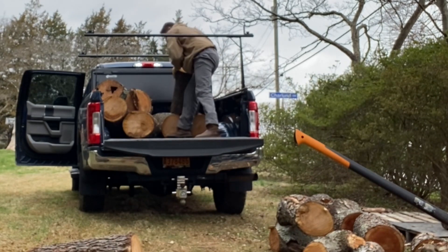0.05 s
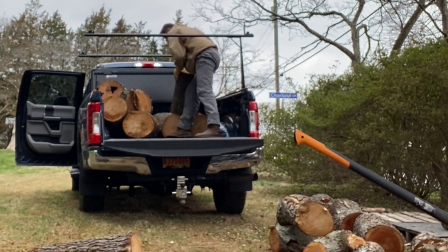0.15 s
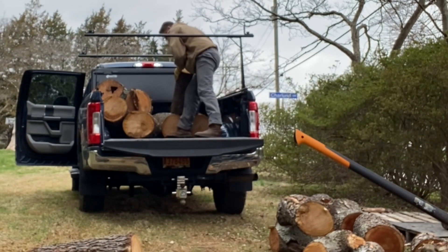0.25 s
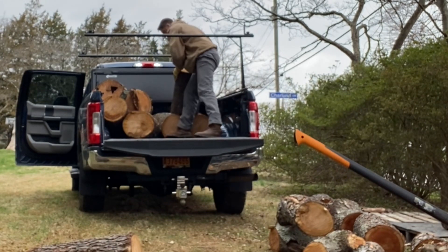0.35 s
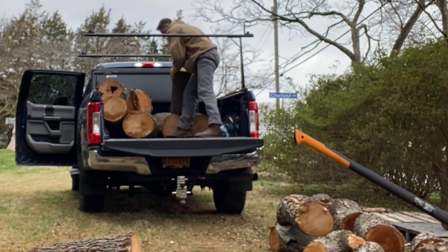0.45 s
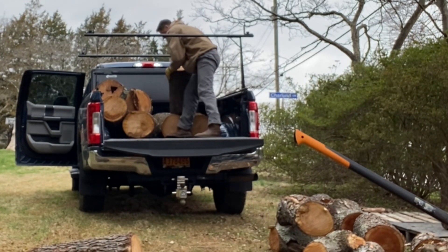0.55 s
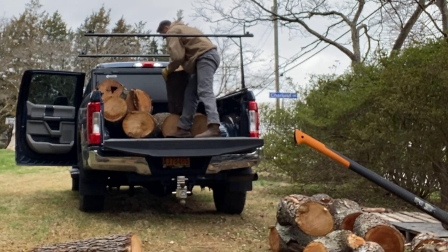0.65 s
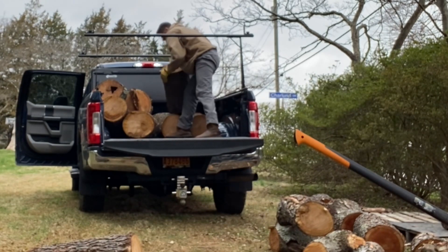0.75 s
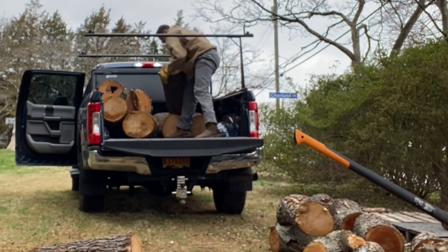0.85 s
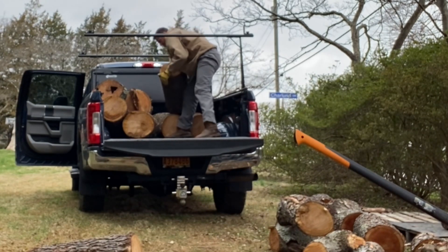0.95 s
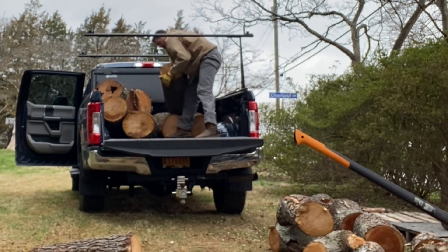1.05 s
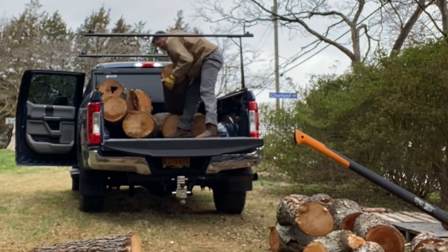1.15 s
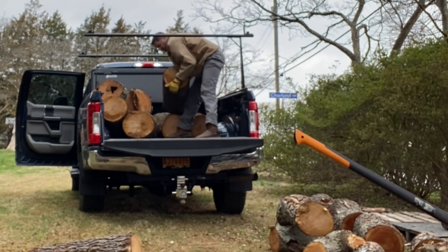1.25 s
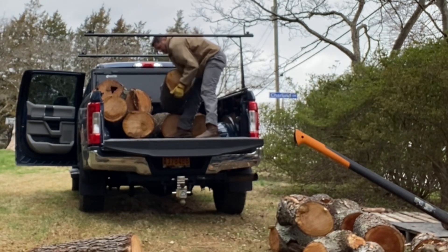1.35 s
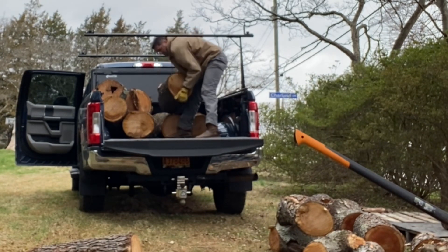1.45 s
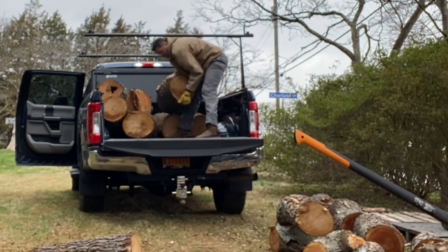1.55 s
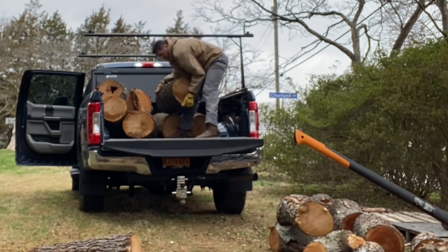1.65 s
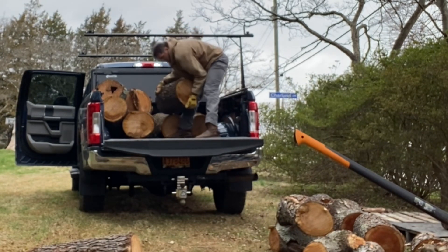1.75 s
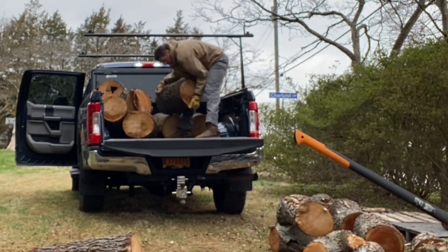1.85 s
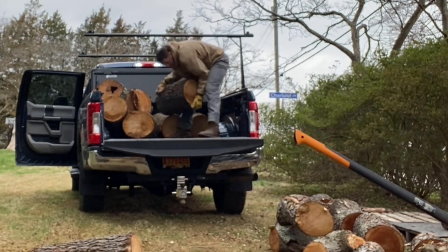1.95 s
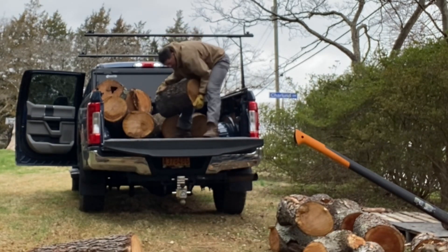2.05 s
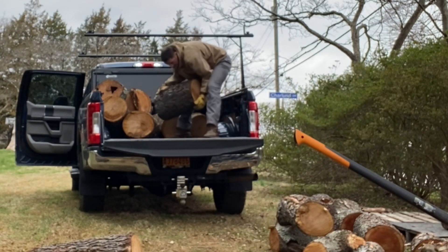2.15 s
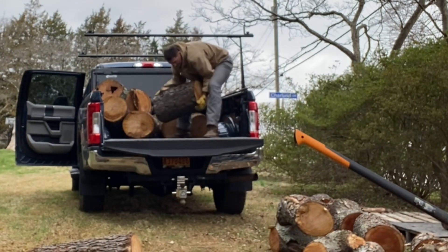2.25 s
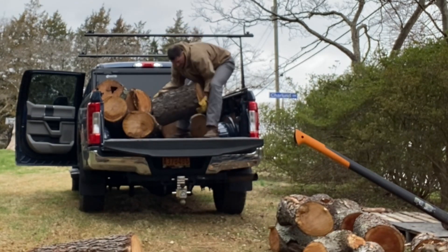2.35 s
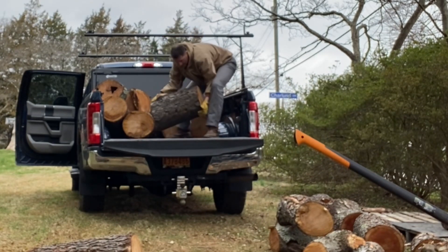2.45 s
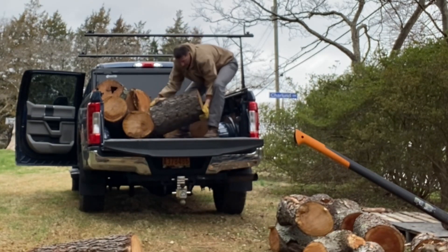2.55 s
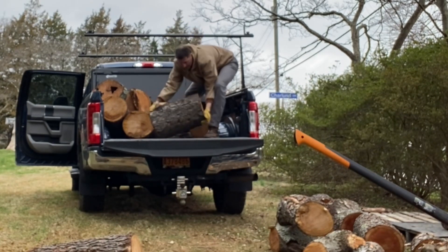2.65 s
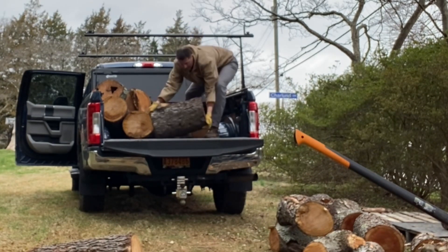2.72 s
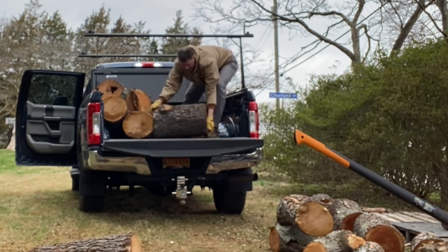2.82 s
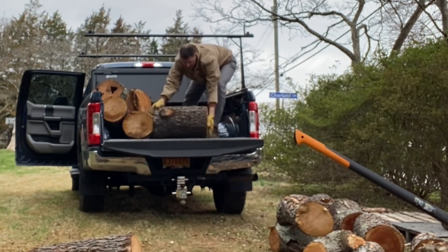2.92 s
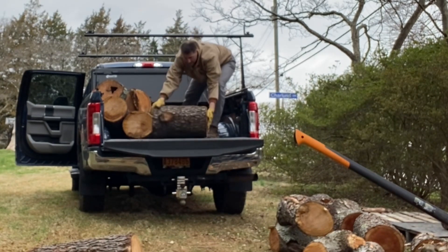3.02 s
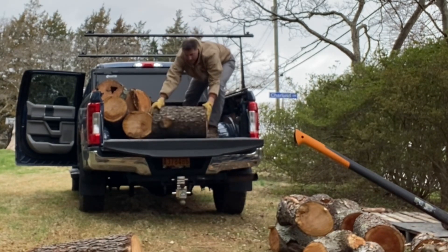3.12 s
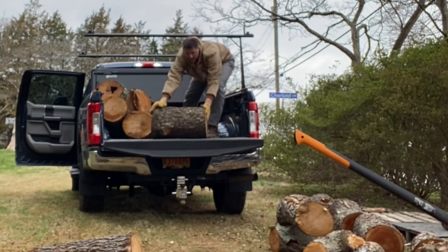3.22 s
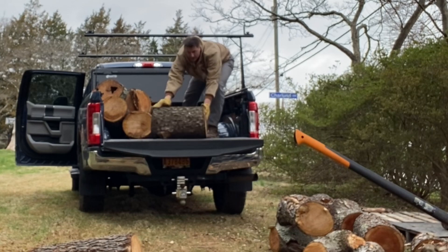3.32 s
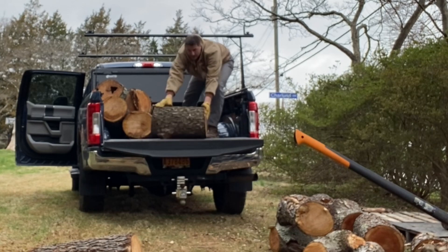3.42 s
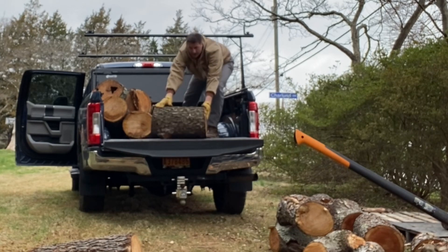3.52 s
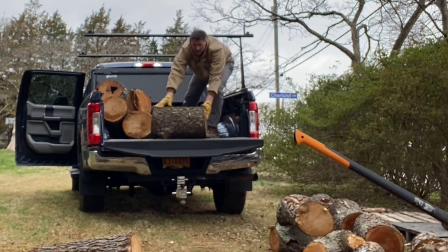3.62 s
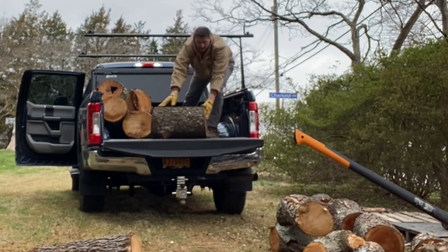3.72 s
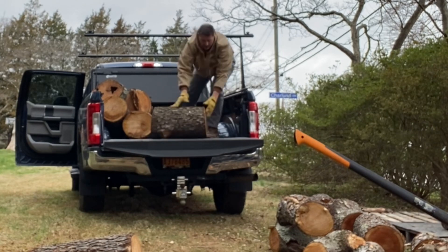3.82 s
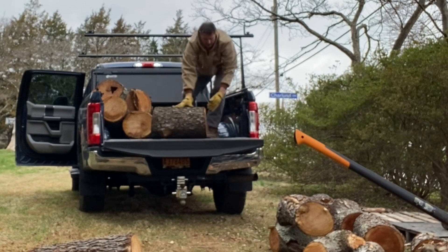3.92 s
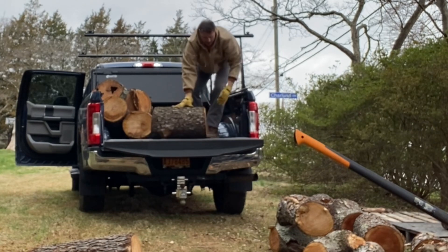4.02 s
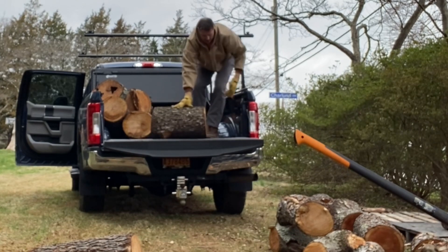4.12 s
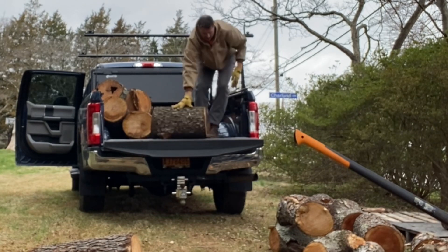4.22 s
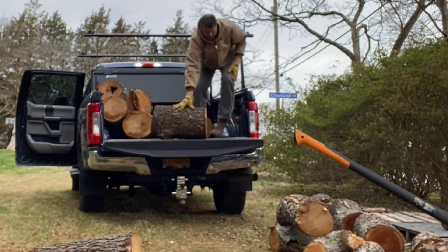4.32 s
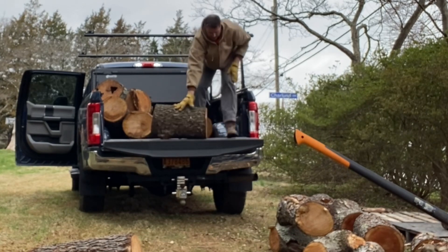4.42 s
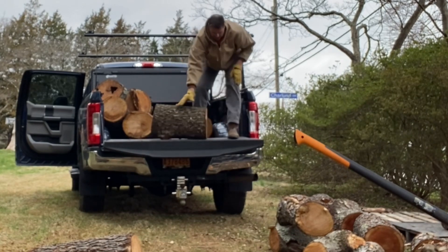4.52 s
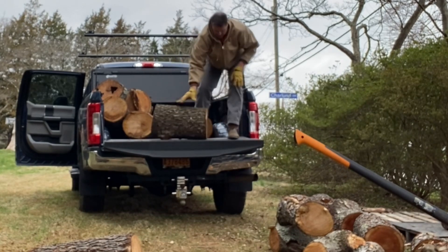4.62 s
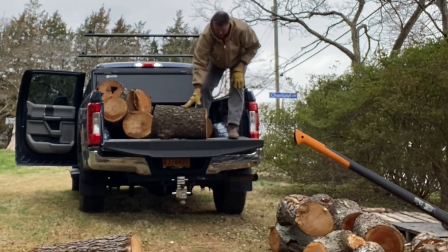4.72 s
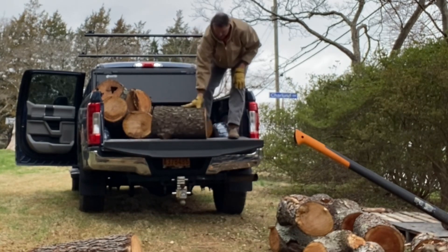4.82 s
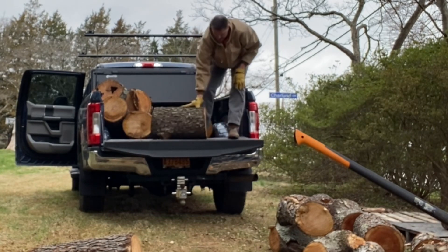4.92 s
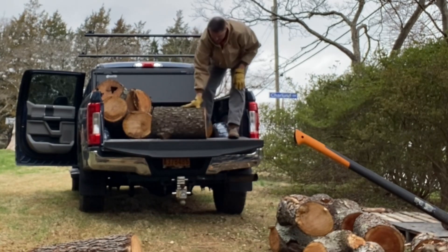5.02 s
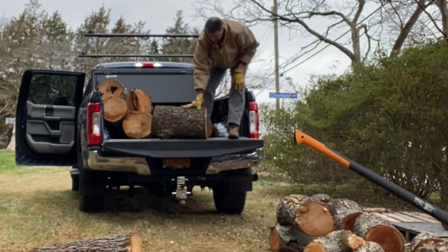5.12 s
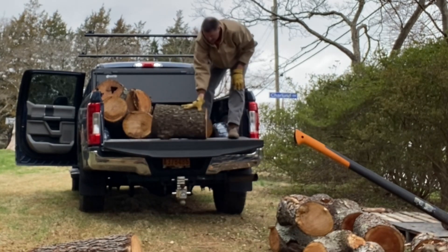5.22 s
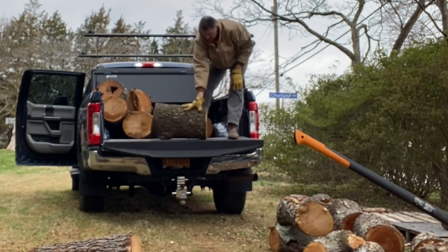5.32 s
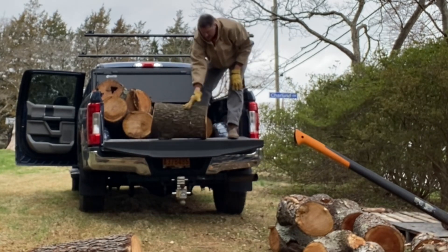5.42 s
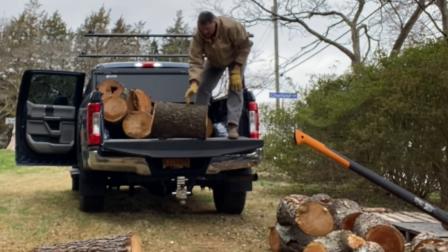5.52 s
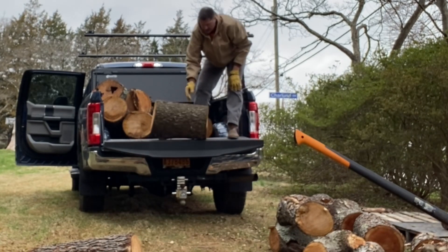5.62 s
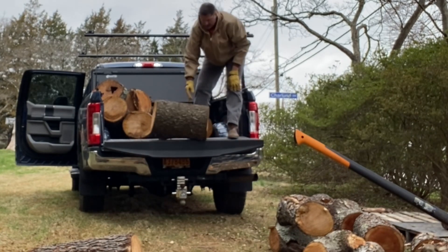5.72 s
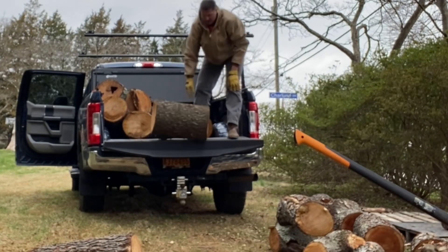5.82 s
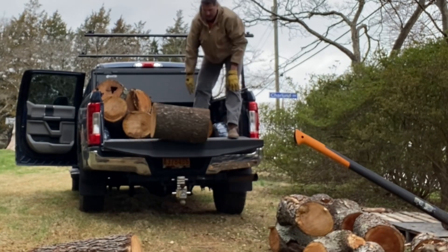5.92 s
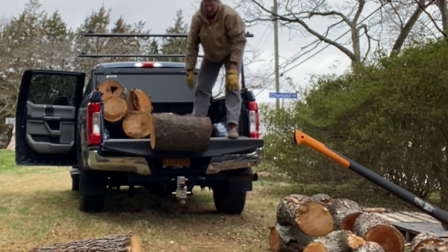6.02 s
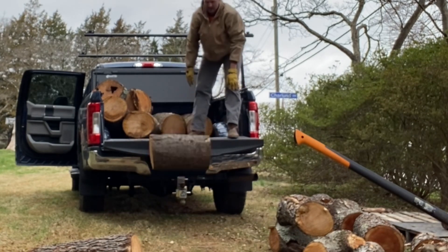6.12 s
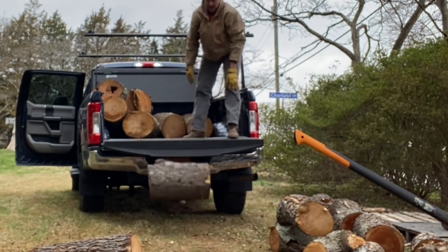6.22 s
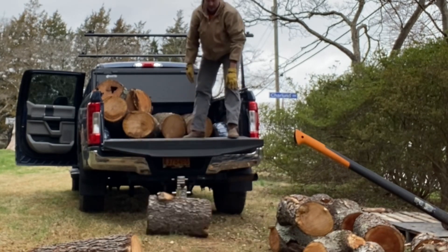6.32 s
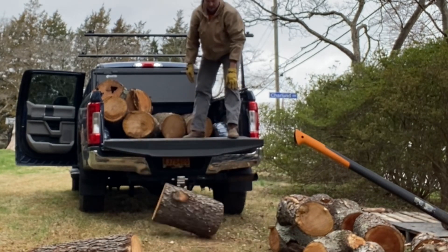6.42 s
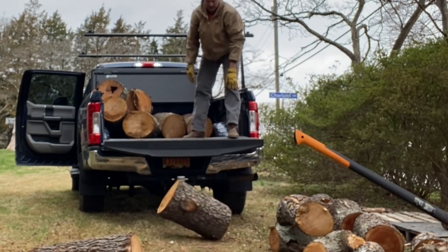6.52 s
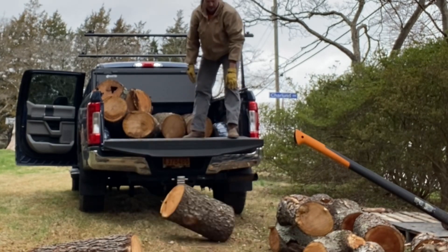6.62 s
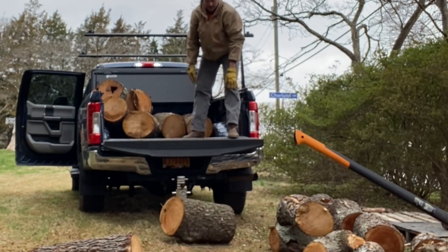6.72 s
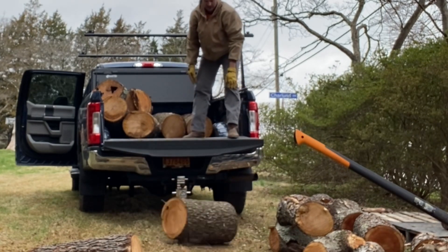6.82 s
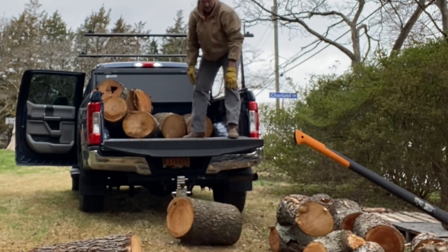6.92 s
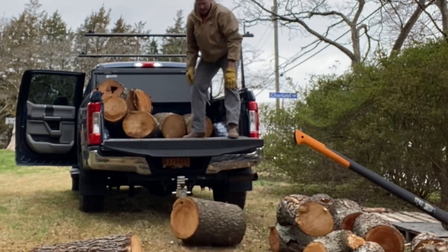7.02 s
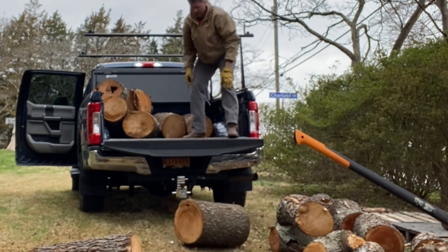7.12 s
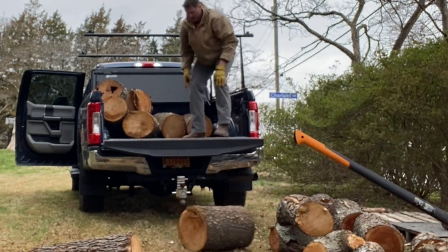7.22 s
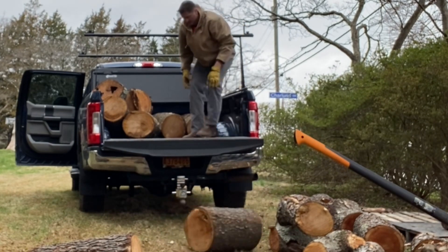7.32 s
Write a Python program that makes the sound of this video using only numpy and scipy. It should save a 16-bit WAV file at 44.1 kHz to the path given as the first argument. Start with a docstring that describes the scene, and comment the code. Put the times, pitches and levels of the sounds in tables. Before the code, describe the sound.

Outdoors in a yard, a bird sings rapid, even, sweeping chirps over soft distant town rumble. Gloves scuff bark lightly, then a heavy log is tipped onto a steel pickup bed with booming thumps, woody knocks, grinding and sharp bark snaps. A few more knocks and scrapes follow before it slides off and lands on grass with one dull, deep thud. A stereo phone microphone hears it with little echo.

```python
"""On the steel bed of a pickup, a man tips down a heavy log, rolls it about and pushes it over the tailgate onto grass.
Blows ring decaying modes of bed, wood and trunk; uneven clicks through the same modes make the log grind.
Filtered noise makes bark rub, snap and crunch, and a low sinking tone shudders after the landing.
Gliding tones sing: one bird sweeps nearby, others are far off, over a town rumble of noise bands."""
import sys
import numpy as np
from scipy import signal
from scipy.fft import rfft, irfft, next_fast_len
from scipy.io import wavfile
from scipy.ndimage import uniform_filter1d

SR = 44100
rng = np.random.default_rng(int(sys.argv[2]) if len(sys.argv) > 2 else 0)


def log_audio(samples):
    """Write samples as a 16-bit WAV file to the path given in sys.argv[1]."""
    # one column per channel
    frames = np.atleast_2d(samples).T
    # limit to full scale, then quantise
    limited = np.clip(frames, -1, 1)
    pcm = np.round(limited * 32767).astype(np.int16)
    wavfile.write(sys.argv[1], SR, pcm)


N = 324576


def undb(db):
    """Decibel law: 20 dB is a factor of ten in amplitude."""
    return 10 ** (np.asarray(db) / 20)


def unit(x):
    """Normalisation to a root-mean-square of 1."""
    return x / np.sqrt(np.mean(x ** 2))


def over_hz(table, hz):
    """Interpolation of (Hz, value) rows on a logarithmic frequency axis."""
    f, v = np.transpose(table)
    return np.interp(np.log(hz + 1), np.log(f + 1), v)


def over_time(rows, col):
    """Envelope: a gain curve from a dB column, effectively silent outside the rows."""
    rows = np.array(rows)
    return undb(np.interp(np.arange(N) / SR, rows[:, 0], rows[:, col], left=-200, right=-200))


def colour(x, table):
    """Linear filtering: the spectrum is weighted by (Hz, dB) rows."""
    gain = undb(over_hz(table, np.fft.rfftfreq(len(x), 1 / SR)))
    return irfft(rfft(x) * gain, len(x))


def add(out, s, x):
    """Superposition: mix x in at s seconds."""
    i = int(s * SR)
    a, b = max(i, 0), min(i + len(x), N)
    out[a:b] += x[a - i:b - i]


def walk(rate):
    """Slow random modulation: levels held 1 / rate seconds and smoothed twice, with spread near 1."""
    k = int(SR / rate)
    steps = np.repeat(rng.standard_normal(N // k + 1), k)
    return 1.3 * uniform_filter1d(uniform_filter1d(steps, k), k)[:N]


def grains(rate, spread_db):
    """Shot noise: random clicks of very uneven size, rate per second."""
    clicks = (rng.random(N) < rate / SR) * rng.standard_normal(N)
    return unit(clicks * undb(spread_db * rng.exponential(size=N)))


def ring(modes, centre_hz, octaves, hold=0.57, sense=-0.75):
    """Modal response: a body struck where modes near centre_hz move most; sense weighs every second mode."""
    hz, db, t60 = np.transpose(modes)[:, :, None]
    hold = max(hold, .2)  # scales every ring time
    t = np.arange(int(SR * np.max(t60) * hold)) / SR
    reach = np.exp(-(np.log2(hz / centre_hz) / octaves) ** 2 / 2 + 0.27 * rng.standard_normal(hz.shape))
    reach[1::2] *= sense
    hz = hz * (1 + 0.017 * rng.standard_normal(hz.shape))
    decay = 1000. ** (-t / (t60 * hold))
    return np.sum(undb(db) * reach * np.sin(2 * np.pi * hz * t) * decay, axis=0)


SLIPS_PER_S = 900


def strike(response, contact, rough):
    """Impact excitation: a sharp blow and the slips of bark after it drive a body; peak 1."""
    t = np.arange(SR // 8) / SR
    slips = (rng.random(len(t)) < SLIPS_PER_S / SR) * rng.standard_normal(len(t)) * np.sqrt(SR / SLIPS_PER_S)
    blow = rough * np.exp(-t / max(contact, .002)) * slips + (t == 0)
    sound = signal.fftconvolve(blow, response)
    sound *= 1 - np.exp(-np.arange(len(sound)) / SR / 0.0012)  # bark gives before the wood takes the blow
    return sound / np.max(abs(sound))


def echoes(x, t60_s, db, dull_hz):
    """Diffuse reverberation: trees and house fronts return a fading, duller wash, unrelated left and right."""
    t = np.arange(int(t60_s * SR)) / SR
    tail = rng.standard_normal((2, len(t))) * 1000. ** (-t / t60_s) * (1 - np.exp(-t / 0.00048))
    tail = signal.lfilter([1], [1, -np.exp(-2 * np.pi * dull_hz / SR)], tail)
    tail = tail / np.sqrt(np.sum(tail ** 2) / 2)
    return undb(db) * signal.fftconvolve(x[None], tail)[:, :N]


def ports(x, phase, balance):
    """Interaural-style cues: two microphone ports differ in phase and level; deep bass keeps its phase."""
    size = next_fast_len(N + SR // 10)
    hz = np.fft.rfftfreq(size, 1 / SR)
    turn = over_hz(phase, hz) * hz ** 2 / (hz ** 2 + 500 ** 2)
    half = np.exp(.5j * turn) * undb(over_hz(balance, hz) / 2)
    return irfft(rfft(x, size) * np.array([half, 1 / half]), size)[:, :N]


# Spectrum of the town. Each row: frequency in Hz, relative level in dB per Hz.
TOWN_SPECTRUM = [(13, -56), (22, -29), (38, -12.5), (53, -5.5), (76, 0), (152, -13), (204, -18),
                 (298, -28.5), (420, -33.5), (896, -33.5), (1490, -42), (2920, -60), (3720, -65),
                 (5720, -72), (7280, -69.5), (12500, -76), (14500, -93)]
# Stereo width of the town. Each row: frequency in Hz, side minus mid level in dB.
TOWN_WIDTH = [(60, -21), (110, -9), (200, -12), (380, 2), (700, 4), (1290, 1.5), (2380, 0), (4400, 2),
              (8120, -8.5), (15000, -16.5)]
# Loudness of the town. Each row: time in seconds, mid level in dB.
TOWN_LEVEL = [(0, -37.5), (1.2, -36.5), (2.5, -37.5), (3.8, -37.5), (4.9, -38.5), (6, -38.5), (7.36, -37)]


def town():
    """Band-filtered noise: half-octaves of far traffic and leaves swell together and flicker alone."""
    white, hz = rfft(rng.standard_normal((2, N))), np.fft.rfftfreq(N, 1 / SR)
    white *= undb(over_hz(TOWN_SPECTRUM, hz) + np.array([0 * hz, over_hz(TOWN_WIDTH, hz)]))
    out, swell = 0, walk(0.89)
    for centre in 25 * 2 ** np.arange(0, 9.6, .5):
        band = np.cos(np.pi * np.clip(np.log2((hz + 1) / centre), -.5, .5)) ** 2
        out = out + irfft(white * band, N) * undb(0.18 * swell + 1.46 * walk(5.5))
    mid, side = out / np.sqrt(np.mean(out[0] ** 2)) * over_time(TOWN_LEVEL, col=1)
    return np.array([mid + side, mid - side])


def note(rows, warble=0.):
    """Frequency modulation: a near-pure gliding tone, its pitch wavering by a share; returns start and sound."""
    s, hz, db = np.transpose(rows)
    t = np.arange(s[0], s[-1], 1 / SR)
    knots = np.arange(s[0], s[-1] + .01, .006)
    waver = np.interp(t, knots, rng.standard_normal(len(knots)))
    glide = np.interp(t, s, hz) * (1 + .003 * rng.standard_normal() + warble * waver)
    db = db + .8 * rng.standard_normal(len(db))  # no two notes swell alike
    return s[0], undb(np.interp(t, s, db)) * np.sin(2 * np.pi * np.cumsum(glide) / SR)


def song(starts, notes, warble):
    """Rhythmic repetition: a figure of notes at (s, dB of each note), never quite on the beat."""
    out = np.zeros(N)
    for s, *dbs in starts:
        s += .0007 * rng.standard_normal()
        for rows, db in zip(notes, dbs):
            lead, tone = note(rows, warble)
            add(out, s + lead, undb(db) * tone)
    return out


# Falling sweep. Each row: time from the beat in seconds, pitch in Hz, relative level in dB.
FALLING_SWEEP = [(-.010, 6800, -20), (-.004, 5910, -18), (.001, 5230, 4), (.009, 4670, -5.5),
                 (.019, 4110, 0), (.030, 3460, 4.5), (.038, 3100, 0), (.045, 3000, -18)]
# Rising sweep. Each row: time from the beat in seconds, pitch in Hz, relative level in dB.
RISING_SWEEP = [(.062, 1700, -8), (.07, 1800, 8), (.086, 2250, 4), (.098, 2680, 6), (.122, 2700, -8)]
PAIR_FIRST_S, PAIR_EVERY_S, PAIR_COUNT = -.024, .1826, 15
FALL_DB, RISE_DB = -53, -56.5  # in mid song, where it is loudest


def near_bird():
    """Glides in even rhythm: a falling and a rising sweep; moving air makes their amplitude flutter."""
    arch = -1.5 * np.linspace(-1, 1, PAIR_COUNT) ** 2  # dB; the falls follow half of it
    beats = PAIR_FIRST_S + PAIR_EVERY_S * np.arange(PAIR_COUNT)
    pairs = zip(beats, FALL_DB + arch / 2, RISE_DB + arch)
    return song(pairs, (FALLING_SWEEP, RISING_SWEEP), .006) * undb(2.2 * walk(250))


# Gloves and boots on bark. Each row: start in seconds, level in dB, hold in seconds, fade in dB per second.
SCUFF_ROWS = [(0.0, -69.5, 0.12, 250), (0.738, -55.5, 0.0089, 300), (0.8, -70.5, 0.13, 200),
              (.965, -72, .03, 200), (1.21, -70, 0.12, 90), (1.46, -76, 0.038, 200),
              (1.75, -64, 0.082, 498), (1.86, -62, 0.088, 260), (2.1, -73, .01, 448),
              (3.78, -72.5, 0.084, 250), (3.92, -66, 0.012, 600), (3.987, -69.5, 0.02, 250),
              (4.16, -57.5, 0.062, 380), (4.315, -59, 0.033, 216), (4.449, -60, 0.027, 248),
              (4.78, -65.5, 0.047, 52), (5.015, -62, 0.053, 259), (5.28, -73.5, 0.13, 151),
              (5.415, -68, 0.049, 325), (5.61, -82, 0.024, 196), (6.0, -64, 0.017, 600),
              (6.03, -61.5, 0.011, 596), (6.319, -49, 0.01, 526), (6.574, -65.5, 0.01, 550),
              (6.752, -62.5, 0.018, 300), (7.09, -76, 0.024, 200), (7.17, -68, 0.064, 300),
              (7.29, -66.5, .08, 300)]
SCUFF_RISE_S = 0.0042


def scuffs():
    """Envelope of friction: each scuff of gloves or boots over bark rises fast, holds and fades."""
    out, t = np.zeros(N), np.arange(SR // 2) / SR
    for s, db, held, fade_db in SCUFF_ROWS:
        fade = undb(db - fade_db * np.maximum(t - SCUFF_RISE_S - held, 0))
        add(out, s, np.minimum(t / SCUFF_RISE_S, 1) * fade)
    return out


# Spectrum of rubbed bark. Each row: frequency in Hz, relative level in dB per Hz.
RUB_SPECTRUM = [(1200, -19), (2500, 3.5), (4000, -4), (6000, -8), (8000, -9.5), (11000, -11.5),
                (13000, -8.5), (15500, -35)]
# Bark crackling as the log is laid down and rolled. Each row: time in seconds, level in dB.
ROLL_LEVEL = [(2.25, -81.5), (2.6, -68.5), (2.83, -57.5), (2.89, -47), (2.95, -47), (2.99, -56),
              (3.09, -64.5), (3.22, -55), (3.28, -65.5), (3.44, -59.5), (3.49, -87)]


def rubbing():
    """Friction as shot noise: dense fine crackle of scuffed and rolled bark, its level flickering."""
    flicker = undb(1.5 * walk(40))
    crackle = unit(colour(grains(2000, 1.4), RUB_SPECTRUM))
    return crackle * (over_time(ROLL_LEVEL, col=1) + scuffs()) * flicker


# A note that sweeps up twice from its held pitch, then drops.
# Each row: time in seconds, pitch in Hz, relative level in dB.
LOW_FIGURE = [(.002, 2200, -12), (.015, 2400, 0), (.055, 2450, 4), (.075, 2750, 1), (.09, 2700, -4),
              (.1, 2350, -3), (.14, 2450, 3), (.165, 2520, 4), (.18, 2780, 2), (.195, 2500, -1),
              (.215, 2000, -5), (.225, 1950, -20)]
# Two quick rises, each ending in a plunge. Each row: time in seconds, pitch in Hz, relative level in dB.
HIGH_FIGURE = [(.128, 3850, -17), (.14, 3900, -1), (.152, 4000, 0), (.16, 4350, -1), (.168, 4300, -1),
               (.173, 3750, 2), (.192, 3050, 1), (.198, 3000, -23), (.215, 3900, -21), (.228, 3900, 1),
               (.243, 3980, 1), (.25, 4350, -1), (.258, 4300, -1), (.263, 3750, 2), (.281, 3050, 1),
               (.287, 3000, -23)]
# A low start and a glide up into a phrase. Each row: time in seconds, pitch in Hz, relative level in dB.
LEAD_GLIDE = [(-.09, 1483, -16), (-.07, 1538, -1.5), (-.035, 1609, -7.5), (-.008, 2000, 0.5),
              (.012, 2390, 5)]
BOUTS_S, PHRASE_EVERY_S, PHRASE_COUNT = (.43, 4.58), .342, 4
LOW_DB, HIGH_DB = -62.5, -63.5


def far_bird():
    """Glides in phrases: a low and a high note, led into after the first of each bout; moving air flutters them."""
    phrases = [(s + k * PHRASE_EVERY_S, LOW_DB, HIGH_DB) for s in BOUTS_S for k in range(PHRASE_COUNT)]
    leads = [row[:2] for k, row in enumerate(phrases) if k % PHRASE_COUNT]
    tones = song(phrases, (LOW_FIGURE, HIGH_FIGURE), .025) + song(leads, (LEAD_GLIDE,), .006)
    return tones * undb(4 * walk(150))


# Bark flakes snapping. Each row: time in seconds, peak in dB before an 8.5 dB cut, pitch in Hz.
SNAP_ROWS = [(0.5705, -54, 10050), (0.673, -51, 10940), (0.6855, -40.5, 9000), (0.7398, -29.5, 7740),
             (0.8574, -49, 5060), (0.9703, -42, 10040), (1.289, -52, 9050), (1.5943, -55, 8960),
             (1.7555, -60, 5500), (1.7794, -59, 5340), (1.8026, -34, 4910), (1.87, -39, 5620),
             (1.8896, -41, 8500), (1.922, -30, 5840), (1.9288, -20, 5600), (1.9405, -33, 6400),
             (1.964, -37, 6960), (2.8603, -24, 5520), (2.881, -27, 9000), (2.9407, -13.5, 7300),
             (3.205, -32, 5500), (3.327, -29, 5700), (3.341, -42, 9900), (3.4002, -41, 8080),
             (3.416, -31, 5200), (3.779, -40.5, 11600), (3.927, -39, 12000), (3.9574, -44, 5190),
             (3.9938, -36, 8300), (4.3237, -29, 9700), (4.782, -39.5, 8750), (4.9546, -47, 9750),
             (4.996, -49, 9930), (5.021, -36.5, 10000), (5.0487, -36, 10300), (5.423, -39, 10400),
             (5.61, -45.5, 4570), (6.006, -45, 4930), (6.4882, -53, 8150), (6.503, -48, 4640),
             (6.579, -50, 5200), (6.7834, -37, 5800), (6.957, -56, 3500), (7.17, -55, 10000),
             (7.196, -49, 5400)]


def snaps():
    """Brittle fracture: each flake is a brief noise burst with a broad spectral peak."""
    out, t = np.zeros(N), np.arange(SR // 20) / SR
    for s, db, hz in SNAP_ROWS:
        fade = (np.exp(-t / 0.0012) + 0.06 * np.exp(-t / 0.009)) * (1 - np.exp(-t / 0.0004))
        burst = rng.standard_normal(len(t)) * fade
        snap = colour(burst, [(hz / 5, -24), (hz / 2.3, -13), (hz, 0), (hz / 0.54, -8), (hz / .3, -7)])
        add(out, s - .001, undb(db - 8.5) * snap / np.max(abs(snap)))
    return out


# Thin calls of other birds. Each row: start in seconds, length in seconds, first and last pitch in Hz, level in dB.
WHISTLE_ROWS = [(0.571, 0.053, 5870, 5760, -78), (0.812, 0.046, 5640, 5700, -71),
                (0.92, 0.067, 5760, 5700, -70), (1.036, 0.052, 5510, 5600, -69),
                (1.21, 0.1, 5510, 5500, -72), (2.446, 0.11, 5150, 5000, -79), (3.53, 0.1, 7300, 7250, -79),
                (3.66, 0.12, 5130, 5080, -74), (3.735, 0.032, 2910, 2700, -63),
                (4.585, 0.022, 3130, 2780, -69), (5.178, 0.1, 5670, 5800, -75),
                (5.292, .06, 5680, 5630, -71.5), (6.614, 0.021, 3150, 2900, -71.5)]


def whistles():
    """Near-sinusoidal tones: thin whistles of other birds, fluttering in moving air."""
    out = np.zeros(N)
    for s, length, hz0, hz1, db in WHISTLE_ROWS:
        rows = [(0, hz0, db - 12), (.2 * length, hz0, db), (.8 * length, hz1, db), (length, hz1, db - 12)]
        add(out, s, note(rows, .014)[1])
    return out * undb(3.5 * walk(130))


# Phase between the ports for near birds. Each row: frequency in Hz, lead of the left in radians.
BIRD_LEAD = [(1800, 2.25), (2240, 3.76), (2700, 3.63), (3270, 6), (4900, 7.9), (7000, 7.7)]


def birds():
    """Direct-to-reverberant ratio: near song reaches the left port first, far song is mostly echo."""
    near, far = near_bird() + whistles(), far_bird()
    direct = ports(near, BIRD_LEAD, [(2000, 0.63), (6000, .5)]) + undb(-8) * far
    return direct + echoes(near, 0.44, -8, 7000) + echoes(far, 0.71, 3.04, 9900)


# Modes of the steel bed. Each row: frequency in Hz, level in dB, t60 in seconds before the hold factor.
BED_MODES = [(78, -1.5, 0.38), (104, 0, 0.22), (136, 3, 0.13), (186, 6.5, 0.084), (208.4, 0.5, 0.13),
             (264.6, 2.5, 0.074), (311, -2, 0.095), (363, -3, 0.062)]
# Full weight thumping on the steel bed.
# Each row: time in seconds, peak in dB, favoured pitch in Hz, contact in seconds, ring time factor.
THUMP_ROWS = [(1.105, -41, 133.7, .012, 0.67), (1.927, -33.5, 164, 0.0098, 0.84),
              (2.105, -20, 187, 0.028, 0.29), (2.733, -21, 150.6, 0.027, 0.79),
              (2.785, -18.5, 136, 0.0042, 0.24), (2.879, -12, 198, 0.0025, 0.8),
              (2.916, -28, 153, 0.012, .98), (2.994, -20.5, 223, 0.034, 0.24),
              (3.395, -36.5, 270, 0.025, .98), (4.169, -15.5, 334, 0.018, 0.37),
              (4.219, -18, 192, 0.0115, 0.61), (4.458, -23, 197, 0.015, 0.79),
              (4.519, -37, 142, 0.016, 0.84), (5.26, -22, 186, 0.027, 0.6),
              (6.043, -28, 133.6, 0.0085, 0.47), (7.319, -28.5, 186, 0.036, .98)]


def thumps():
    """Modal excitation: the full weight strikes the low modes of the bed."""
    out = np.zeros(N)
    for s, db, hz, contact, hold in THUMP_ROWS:
        body = ring(BED_MODES, hz, octaves=0.383, hold=hold)
        add(out, s - .001, undb(db) * strike(body, contact, rough=0.032))
    return out


# The floor booming under rolling weight. Each row: time of the peak in seconds, level in dB.
BOOM_ROWS = [(2.75, -29), (2.916, -24), (3.055, -30), (3.262, -48)]
BOOM_RISE_DB_PER_S, BOOM_FADE_DB_PER_S = 701, 382


def booms():
    """Exponential envelope: a steep swell and slower fall as the weight rolls onto the floor."""
    t = np.arange(N) / SR
    return sum(undb(db - np.maximum(BOOM_RISE_DB_PER_S * (s - t), BOOM_FADE_DB_PER_S * (t - s)))
               for s, db in BOOM_ROWS)


# Modes of the wood. Each row: frequency in Hz, level in dB, t60 in seconds before the hold factor.
WOOD_MODES = [(412, 3.5, 0.09), (546, -22, 0.042), (673, -1.5, 0.042), (746, -7, 0.1), (840, 3, 0.046),
              (943, 1, 0.053), (1050, 4, 0.02), (1132, 2, 0.041), (1306, 0.5, 0.029), (1400, -1, 0.058),
              (1451, -3, 0.045), (1650, -15, 0.026), (1830, 0, 0.019), (2300, 9, 0.032)]
# Passes of the log grinding over the bed, one list each.
# Each row: time in seconds, bed level in dB, wood level in dB.
GRIND_PASSES = [
    [(1.7, -58, -56.5), (1.916, -48, -51), (2.036, -59, -69), (2.178, -44.5, -72), (2.3, -69, -74)],
    [(2.66, -56, -67), (2.76, -27, -40), (2.88, -33, -42.5), (2.914, -24, -35.5), (3.024, -30.5, -49.5),
     (3.158, -45.5, -52), (3.264, -44.5, -58), (3.426, -43.5, -48), (3.55, -49, -91)],
    [(4.12, -47.5, -80), (4.246, -34, -54), (4.378, -48, -70), (4.526, -35, -48), (4.62, -52.5, -91)],
    [(4.75, -73, -70), (4.832, -50, -57.5), (4.978, -52, -60), (5.268, -44.5, -60.5), (5.5, -61, -64)],
    [(5.9, -62, -69), (5.98, -41.5, -67), (6.04, -38.5, -54.5), (6.13, -44.5, -64), (6.2, -53, -78)],
]


def grinding():
    """Stick-slip friction: ridges of bark catch and slip, clicking into bed and wood; the whole floor booms."""
    catch = grains(1500, 2.5)
    bed = unit(signal.fftconvolve(catch, ring(BED_MODES, 200.0, octaves=0.74))[:N])
    wood = unit(signal.fftconvolve(catch, ring(WOOD_MODES, 960, octaves=0.65, hold=0.47))[:N])
    boom = unit(signal.fftconvolve(catch, ring(BED_MODES, 61.7, octaves=0.15, hold=0.68))[:N])
    load, scrape = (uniform_filter1d(sum(over_time(rows, col=c) for rows in GRIND_PASSES), size=SR // 50)
                    for c in (1, 2))
    return bed * load + wood * scrape + boom * booms()


# Spectrum of cracking bark. Each row: frequency in Hz, relative level in dB per Hz.
CRACK_SPECTRUM = [(1060, -1), (1800, -3.5), (2010, -4), (2900, -7), (3350, -6), (4850, -10.5),
                  (6240, -10.5), (7080, -14.5), (12200, -21.5)]
# Its top end. Each row: frequency in Hz, relative level in dB per Hz.
CRACK_TREBLE = [(15500, -40)]
# Knocks on wood. Each row: time in seconds, wood peak in dB, crack peak in dB before a 2 dB lift,
# favoured pitch in Hz, spread of modes in octaves, contact in seconds.
KNOCK_ROWS = [(1.928, -35.5, -37, 850, 0.31, 0.0057), (2.102, -25, -50, 860, 0.47, 0.013),
              (2.703, -33.5, -54, 1100, 0.44, 0.018), (2.711, -23, -47, 706, 1.1, 0.014),
              (2.722, -22, -38, 696, 0.74, 0.034), (2.877, -16, -36, 703, 0.51, 0.032),
              (2.894, -18.5, -47, 840, 1.1, 0.014), (2.916, -41, -50, 820, 0.65, 0.019),
              (2.938, -27, -30, 900, 1.1, 0.02), (2.953, -22.5, -44, 840, 0.55, 0.019),
              (3.022, -30.5, -50, 1200, 0.44, 0.0082), (3.036, -39, -49, 800, 0.47, .0099),
              (3.095, -32, -53, 930, 0.33, 0.014), (3.153, -40, -49, 870, 0.42, 0.027),
              (3.206, -23.5, -37, 1130, 0.27, 0.0032), (3.261, -37.5, -51, 910, 0.47, 0.008),
              (3.341, -39, -48, 1100, 0.23, 0.0035), (3.393, -19, -56, 996, 0.09, 0.0027),
              (3.415, -31, -57, 980, 0.26, 0.006), (3.433, -31, -39, 980, 0.34, 0.011),
              (4.16, -26, -53, 1040, 0.45, 0.018), (4.215, -24, -40, 910, 0.5, 0.013),
              (4.228, -31, -59, 716, 0.42, 0.017), (4.305, -47, -51, 1190, 0.31, .012),
              (4.322, -28, -52, 1250, 0.4, 0.006), (4.454, -22, -42, 1050, 0.4, 0.022),
              (5.022, -42, -61, 910, 0.19, 0.015), (5.254, -35, -58, 1050, 0.64, 0.01),
              (5.738, -46, -71, 1200, .5, 0.0056), (6.0, -45, -58, 1100, 0.51, 0.039),
              (6.764, -39, -45.5, 1300, 0.94, 0.017), (7.31, -31, -50, 980, 0.32, 0.018),
              (7.334, -31, -48.5, 940, 0.27, 0.018)]
WOOD_ROUGH = 0.11  # share of bark slips in a blow


def knocks():
    """Modal excitation with contact damping: wood rings under a crack of bark, shorter when struck harder."""
    out, t = np.zeros(N), np.arange(SR // 8) / SR
    for s, wood_db, crack_db, hz, spread, contact in KNOCK_ROWS:
        hold = 1 - 0.05 * (wood_db + 30)  # harder knocks press the wood down
        body = ring(WOOD_MODES, hz, octaves=spread, hold=hold, sense=0.71)
        add(out, s - .002, undb(wood_db) * strike(body, contact, WOOD_ROUGH))
        fade = (np.exp(-t / max(contact, .002)) + 0.17 * np.exp(-t / 0.069)) * (1 - np.exp(-t / 0.00061))
        crack = colour(fade * rng.standard_normal(len(t)), CRACK_SPECTRUM + CRACK_TREBLE)
        add(out, s - .0015, undb(crack_db + 2.0) * crack / np.max(abs(crack)))
    return out


# Bark crushed under the weight. Each row: time in seconds, peak in dB, pitch in Hz, length in seconds.
CRUNCH_ROWS = [(2.721, -32.5, 3580, 0.011), (2.751, -43, 3380, .02), (2.881, -41, 2400, .02),
               (2.93, -34, 3270, .03), (2.946, -37, 2300, 0.021), (3.232, -47, 3630, 0.031),
               (3.437, -41, 4050, 0.0096), (3.438, -41, 5160, 0.0085), (4.158, -44, 3380, 0.031),
               (4.215, -50, 4100, 0.017), (4.321, -38.5, 4040, 0.006), (4.446, -44, 2580, 0.014),
               (6.038, -56, 3700, 0.013), (6.764, -50, 1610, 0.025), (6.956, -59, 3300, 0.011),
               (7.185, -59, 2500, 0.038)]
SPLINTERS_PER_S, SPLINTER_T60_S = 1500, 0.015


def crunches():
    """Successive fracture: splinters break one after another, each a short ring near the pitch of the burst."""
    out, t = np.zeros(N), np.arange(SR // 10) / SR
    for s, db, hz, length in CRUNCH_ROWS:
        chance, size = rng.random((2, len(t)))
        breaks = (chance < SPLINTERS_PER_S / SR) * (size - .5) * np.exp(-(t / length) ** 2) + (t == 0) / 2
        near = hz * (1 + 0.074 * rng.standard_normal((3, 1)))
        splinter = np.sum(np.sin(2 * np.pi * near * t), axis=0) * 1000. ** (-t / SPLINTER_T60_S)
        burst = signal.fftconvolve(breaks, splinter)
        add(out, s, undb(db) * burst / np.max(abs(burst)))
    return out


# Modes of the trunk. Each row: frequency in Hz, level in dB, t60 in seconds before the hold factor.
TRUNK_MODES = [(178.6, 3.5, 0.037), (223, 5.5, 0.15), (297, -12.5, 0.033), (419, -3.5, 0.083),
               (578, -14.5, 0.096), (650, -5, 0.057)]
# One end lands just before the other. Each row: time in seconds, trunk peak in dB, wood peak in dB.
LANDING_ROWS = [(6.328, -10.5, -17), (6.339, -24.5, -26.5)]


def landing():
    """Damped modal impact: the log lands on grass and the turf shortens its ring."""
    out = np.zeros(N)
    for s, trunk_db, wood_db in LANDING_ROWS:
        trunk = ring(TRUNK_MODES, 230, octaves=2.1)
        wood = ring(WOOD_MODES, 1050, octaves=0.63, hold=0.29, sense=1.0)
        add(out, s, undb(trunk_db) * strike(trunk, 0.011, 0.017))
        add(out, s, undb(wood_db) * strike(wood, 0.0061, WOOD_ROUGH))
    return out


# The ground after the landing. Its one row: start in seconds, starting pitch in Hz, level in dB, t60 in seconds.
GROUND_SHUDDER = (6.359, 53, -9, .18)


def shudder():
    """Damped oscillation: the ground shudders at a sinking low pitch."""
    out, t = np.zeros(N), np.arange(SR // 3) / SR
    s, hz, db, t60 = GROUND_SHUDDER
    phase = 2 * np.pi * np.cumsum(hz / (1 + 3 * t)) / SR
    fade = 1000. ** (-t / t60) * (1 - np.exp(-(t / .014) ** 2))
    add(out, s, -undb(db) * np.sin(phase) * fade)
    return out


# Phase between the ports for the truck. Each row: frequency in Hz, lead of the left in radians.
TRUCK_LEAD = [(860, -.6), (1290, .4), (2840, -2.2), (4220, -1.3), (5770, -.7), (7670, .1), (10500, .2),
              (12100, 1.6), (14000, 3.1)]
# Level between the ports for the truck. Each row: frequency in Hz, left minus right in dB.
TRUCK_LEVEL = [(60, 0.5), (110, 0), (200, 1), (380, 3), (700, -7), (1290, 6.5), (2380, 2), (4400, -1.5),
               (8120, 1.5), (15000, -1.5)]


def scene():
    """Superposition of sources: truck and log, their echoes without bass, birds and town."""
    truck = rubbing() + snaps() + thumps() + grinding() + knocks() + crunches() + landing() + shudder()
    thin = signal.sosfilt(signal.butter(2, 350, "high", fs=SR, output="sos"), truck)
    return ports(truck, TRUCK_LEAD, TRUCK_LEVEL) + echoes(thin, 0.32, -10.5, 6800) + birds() + town()


def record(dry):
    """Band limiting: the phone drops the deepest bass, rolls off near 15.6 kHz and cuts above 15.8 kHz."""
    soft = signal.sosfilt(signal.butter(3, [34, 15600], "band", fs=SR, output="sos"), dry)
    return signal.sosfilt(signal.ellip(8, .2, 70, 15800, fs=SR, output="sos"), soft)


dry = scene()
out = record(dry)
log_audio(out)
```